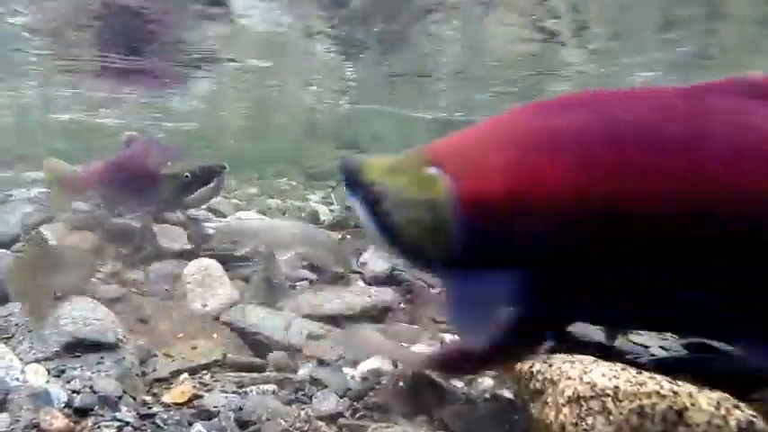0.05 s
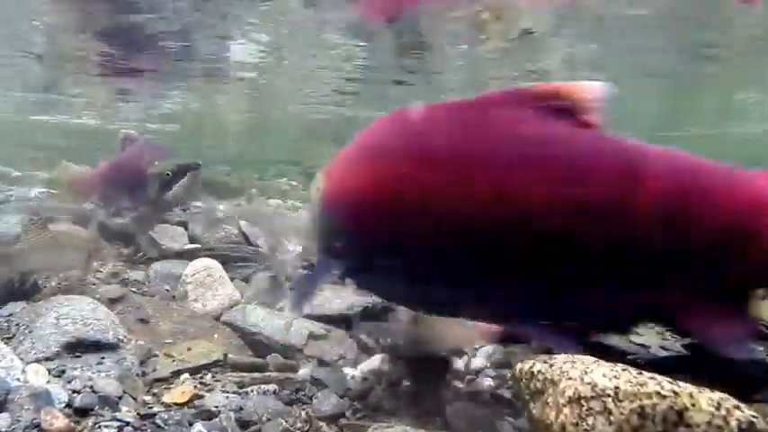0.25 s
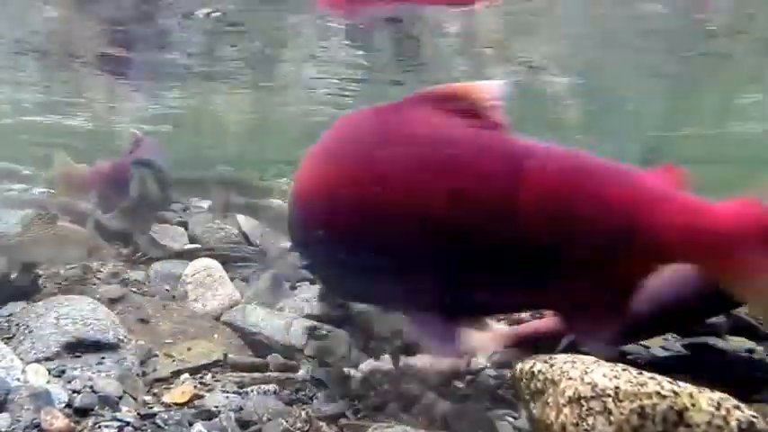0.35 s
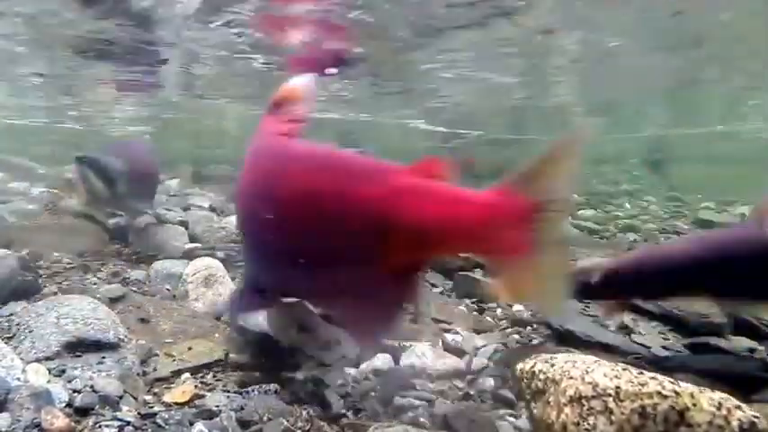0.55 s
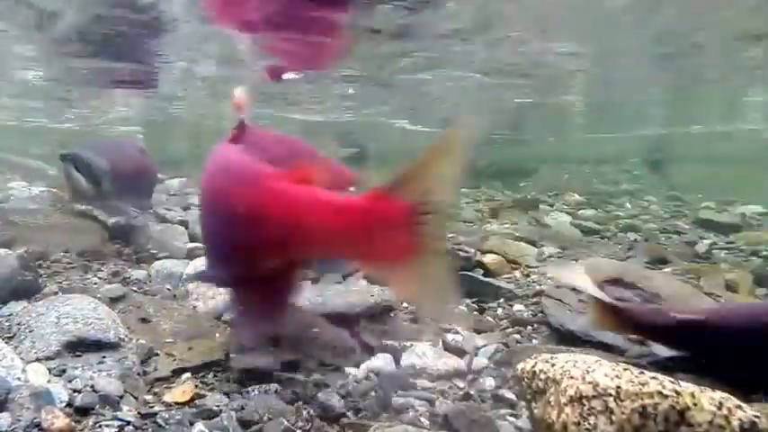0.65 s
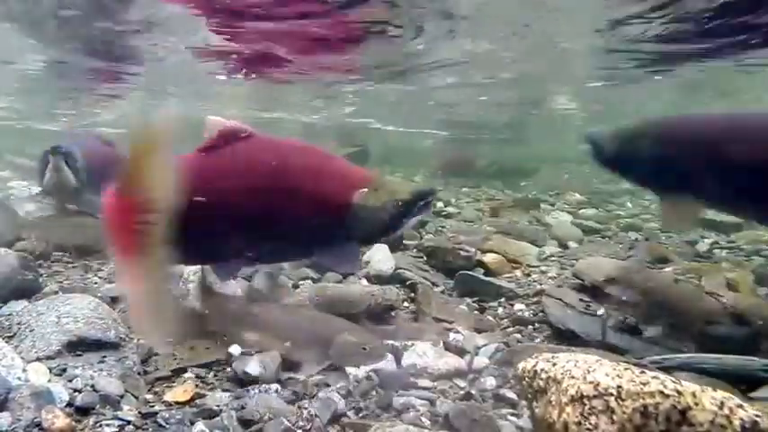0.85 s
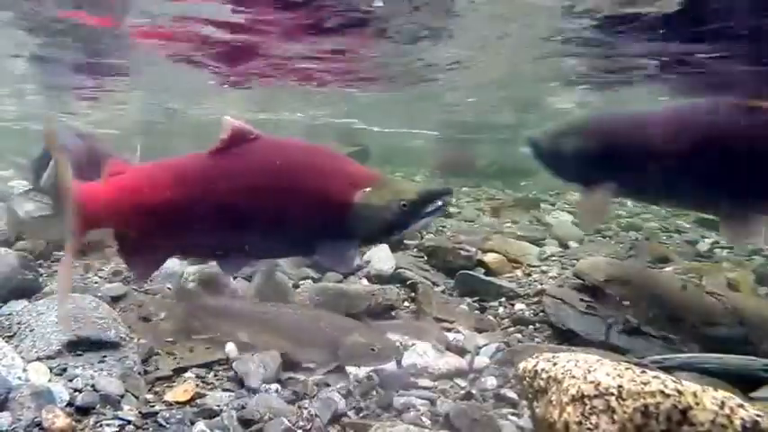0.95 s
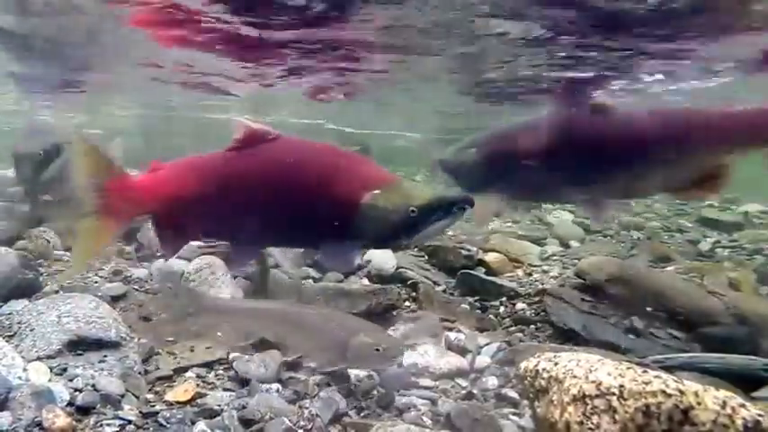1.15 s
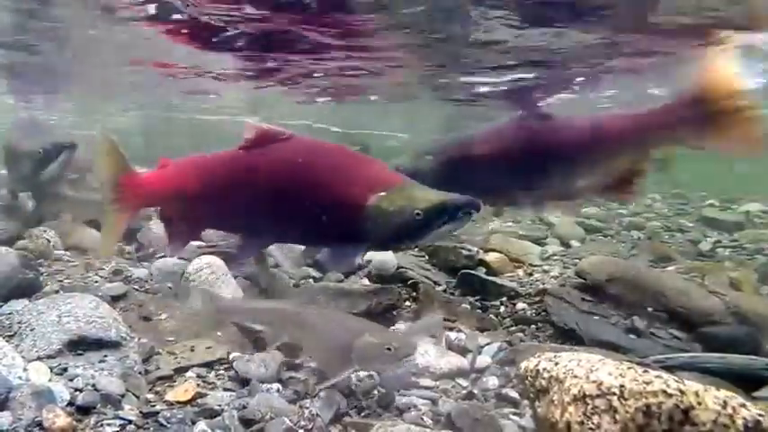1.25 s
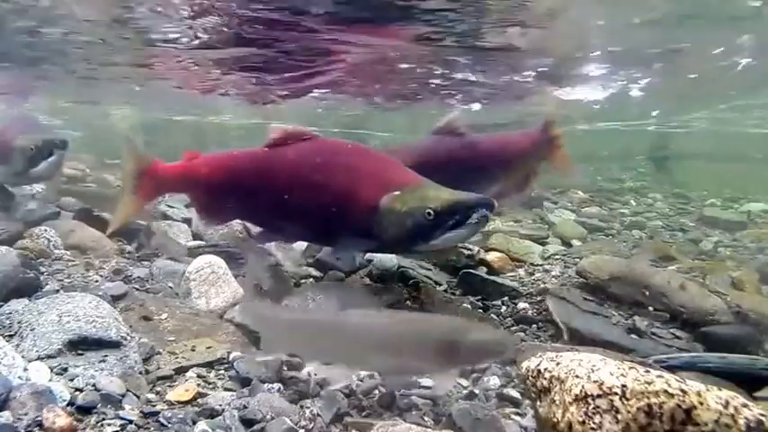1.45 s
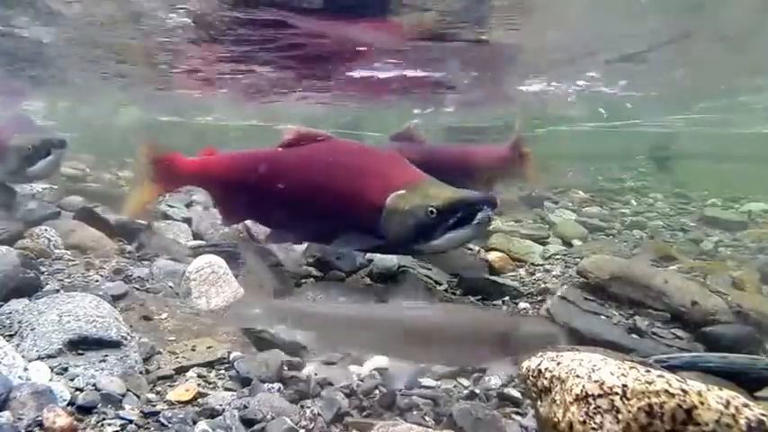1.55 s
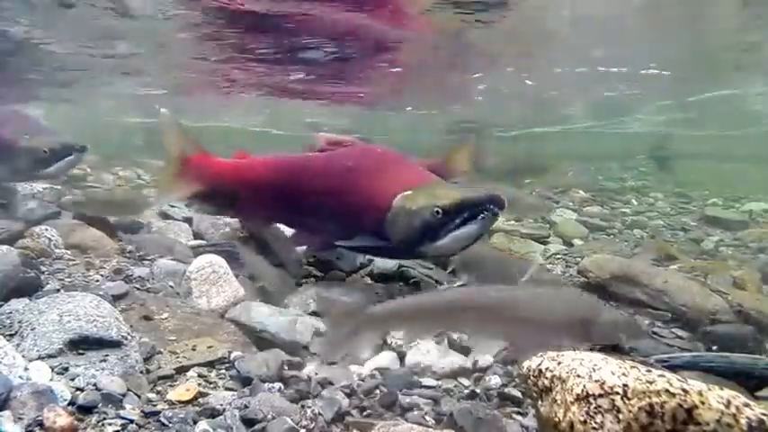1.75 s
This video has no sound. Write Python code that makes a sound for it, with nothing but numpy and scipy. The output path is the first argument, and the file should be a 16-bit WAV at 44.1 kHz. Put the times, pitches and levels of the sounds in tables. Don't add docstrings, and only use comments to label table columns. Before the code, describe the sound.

Pebbles and grit clatter briefly against an underwater camera case as a fish's tail sweeps the riverbed

```python
import sys
import numpy as np
from scipy import signal
from scipy.fft import rfft, irfft
from scipy.io import wavfile
from scipy.ndimage import uniform_filter1d

SR = 44100
rng = np.random.default_rng(int(sys.argv[2]) if len(sys.argv) > 2 else 0)


def volts_from_db(level):
    exponent = np.asarray(level, float) / 20
    return 10 ** exponent


def int16_out(signal):
    q = np.round(np.clip(np.atleast_2d(signal).T, -1, 1) * 32767)
    wavfile.write(sys.argv[1], SR, q.astype(np.int16))


N = 79380

# f/Hz, level/dB, t60/s
CASE_MODES = [(3196, -10.5, 0.016), (743, 2.5, 0.037), (1490, 4, 0.015), (1914, -3.5, 0.014),
              (2376, 4, 0.0085), (2814, 2, 0.004), (13120, -3.5, 0.0034), (3610, -17.5, 0.022),
              (4583, 5.5, 0.005), (5290, -2.5, 0.0079), (6070, -10.5, 0.011), (7370, 4, 0.0059),
              (9980, 5, 0.0037), (11100, 0.5, 0.0064)]


def add(out, start_s, sounds):
    for s, x in zip(start_s, sounds):
        i = max(int(s * SR), 0)
        out[i:i + len(x)] += x[:max(N - i, 0)]


def decay(t, t60):
    return np.exp(-np.log(1000) * t / t60)


def case_rings(size=1400):
    rise_s = 0.00007
    hz, db, t60 = np.array(CASE_MODES).T[:, :, None]
    t = np.arange(size) / SR
    sign = (-1.) ** np.arange(len(CASE_MODES))[:, None]
    swing_up = 1 - np.exp(-t / rise_s)
    return sign * volts_from_db(db) * swing_up * np.sin(2 * np.pi * hz * t) * decay(t, t60)


def knocks(rows, lean_db=None, size=2048, order=128):
    reach_oct, scatter_db = 0.99, 2.5
    dead_hz, dead_oct, dead_db, stiff_hz = 1184, 0.2, -27, 325
    evenness = 0.73
    crack_db = -14.5
    s, db, bright, ms = np.array(rows).T
    grains = rng.standard_normal((len(s), 400))
    mix_db = scatter_db * rng.standard_normal((len(s), len(CASE_MODES)))
    if lean_db:
        mix_db[:, [8, 11]] = np.outer(lean_db, [1, -1])

    f = np.maximum(np.arange(size // 2 + 1) * SR / size, 1.)
    colour_db = -6 * ((np.log2(f / 2850.0) - bright[:, None]) / reach_oct) ** 2
    colour_db = colour_db + dead_db * np.exp(-(np.log2(f / dead_hz) / dead_oct) ** 2)
    colour = volts_from_db(colour_db) / (1 + (stiff_hz / f) ** 4)

    u = np.arange(400) / SR * 1000 / np.maximum(ms, .02)[:, None]
    rattle = rfft(np.sqrt(u) * np.exp(-2 * u) * grains, size)
    rattle = rattle / np.abs(rattle) ** evenness

    ringing = rfft(volts_from_db(mix_db) @ case_rings(), size)
    crack = volts_from_db(crack_db) * f / 1000
    x = irfft((ringing + crack) * rattle * colour, size)
    gain = volts_from_db(db) / np.abs(x).max(axis=1)
    out = np.zeros(N)
    add(out, s - order / SR, np.roll(x, order, axis=1) * gain[:, None])
    return out


def pebbles():
    # t/s, peak level/dB, brightness/octaves, rattle/ms
    hits = [(.2286, -29, 1.48, 1.3), (.3192, -23, 1.13, 0.7), (.378, -37, 0.46, 1.1),
            (.4012, -30, 1.24, 0.34), (.4031, -32.5, 0.16, 0.24), (.4655, -41, 1.37, 2.2),
            (.546, -46, 0.81, 1.2), (.590, -45, 0.11, .6), (.2225, -61, 0.87, 0.31), (.340, -58, 1.6, 0.4),
            (.5981, -25.5, -0.17, 0.042), (.6005, -28.5, 1.2, 0.73), (.6912, -32, 0.75, 0.27),
            (.7385, -32.5, 1.2, 0.57), (.795, -37, 0.84, 0.51)]
    lean_db = [4.5, -1.5, 1.5, 1, -2.5, 1, -2, .1, 2, .1, -1, 1.5, 0.5, -2, -1.2]
    return knocks(hits, lean_db)


def blows():
    # t/s, length of the push/ms
    stones = [
        (.56005, .2),
        (.68772, .45),
    ]
    # hard blow/dB, dull blow/dB
    strength = [(-31.5, -24), (-37, -32), (-22.5, -23.5), (-22, -33.5), (-17.5, -27), (-21, -23),
                (-32, -28.5), (-30, -40), (-11.5, -25), (-40, -31), (-23.5, -25), (-9.5, -30)]
    mode_hz = [550, 795, 1470, 1975, 2410, 2640, 3030, 3720, 4750, 5970, 7370, 10300]
    mode_t60 = [.005, .021, .019, .014, .013, .009, .016, .02, .0057, .014, .01, .004]
    first_swing = [1, -1, 1, -1, -1, -1, -1, 1, 1, 1, -1, -1]
    hz, t60 = np.array(mode_hz)[:, None], np.array(mode_t60)[:, None]
    t = np.arange(1800) / SR
    modes = np.sin(2 * np.pi * hz * t) * decay(t, t60)
    x = (volts_from_db(np.array(strength).T) * first_swing) @ modes
    no_thud = signal.butter(2, 220, "high", fs=SR, output="sos")
    x = signal.sosfilt(no_thud, x)
    struck = []
    for ring, (_, ms) in zip(x, stones):
        push = np.hanning(round(ms * SR / 1000) + 2)[1:-1]
        struck.append(np.convolve(ring, push / push.sum()))
    out = np.zeros(N)
    add(out, [s for s, _ in stones], struck)
    return out


def grit():
    # t/s, peak level/dB, brightness/octaves, rattle/ms
    early = [(0.1436, -44, 0.45, 0.45), (0.1655, -61, 1, 0.78), (0.1792, -39, 0.91, 1),
             (0.1835, -43, 0.9, 0.8), (0.1917, -42, 1, 0.72), (0.197, -53, 0.85, 0.92), (0.2041, -48, 1, 1),
             (0.208, -50, 1, 0.94), (0.215, -49, 1, 0.93), (0.2446, -47, 0.99, 1), (0.2613, -45, 0.8, 0.7),
             (0.2692, -39.5, 0.7, 0.93), (0.2867, -40, 0.58, 0.91), (0.2907, -46, 1, 0.97),
             (0.2974, -46, 0.94, 0.48), (0.3613, -48, 1, 0.89), (0.3736, -43.5, 0.8, 0.53),
             (0.3897, -53, 0.35, 1), (0.422, -42, 1, 0.99), (0.427, -42, 0.61, 0.31),
             (0.4363, -52, 0.67, 0.58), (0.4948, -43, 0.5, 0.82), (0.5004, -47, 0.3, 0.8)]
    # t/s, peak level/dB, brightness/octaves, rattle/ms
    late = [(0.5809, -39.5, 0.77, 0.86), (0.6068, -48, 0.42, 0.97), (0.636, -48, -0.026, 0.82),
            (0.642, -40.5, 0.18, 0.65), (0.6544, -40, 0.083, 1), (0.668, -63, -0.067, 0.81),
            (0.675, -42, 1, 0.76), (0.7108, -56, 0.55, 0.85), (0.712, -39.5, 0.0062, 0.57),
            (0.7223, -46, -0.003, 0.87), (0.7246, -46, 0.21, 0.57), (0.7282, -46, 0.13, 1),
            (0.7491, -47, 0.36, 0.96), (0.8335, -49, 0.56, 0.82), (0.8451, -49, 0.6, 0.63),
            (0.9157, -47, -0.073, 0.31), (0.9294, -47.5, 0.53, 0.8), (0.9914, -46, 0.55, 0.67),
            (1.066, -48.5, 0.52, 0.73), (1.0948, -53.5, 0.56, 0.67), (1.1264, -55, 0.33, 0.66),
            (1.6696, -54, 0.79, 0.63)]
    # t/s, peak level/dB,
    # brightness/octaves, rattle/ms
    stray = [(.1875, -56, 1.4, .5), (.2295, -44, -0.086, 0.76), (.2535, -47, 1.4, .8),
             (.302, -50, 0.7, 0.76), (.347, -54, 1.7, .7), (.4315, -51, 1.5, .6), (.475, -53, 0.67, .6),
             (.5735, -54, 1.9, .9), (.5982, -31.5, 1.1, 0.6), (.5598, -33.5, 0.42, 0.077),
             (.6555, -39.5, 2, 1), (.662, -39, -0.021, 0.47), (.7715, -62, 1.2, .6),
             (.866, -56, 0.16, 0.39), (.946, -58, 1.7, .5), (.9775, -52, 0.47, .5), (1.036, -55, 1.4, .5),
             (1.045, -55, 2, .5), (1.0945, -50, 0.79, .3), (1.141, -61, 0.36, .6), (1.176, -55.5, 2, .5)]
    return knocks(early) + knocks(late) + knocks(stray)


def scrapes(count=36):
    # start t/s, length/s, grain level/dB, brightness/octaves
    slides = [
        (0.164, 0.055, -55.5, 1.6),
        (.416, 0.019, -58, 0.42),
        (0.541, 0.0098, -63, 1.2),
        (0.629, 0.053, -54.5, 0.33),
        (0.635, 0.025, -57.5, 1.3),
        (0.723, 0.0093, -60, 1.1),
        (0.734, .005, -53.5, -.3),
    ]
    rattle_ms = 0.45
    s, length, db, bright = np.array(slides).T[:, :, None]
    place, tint = rng.random((2, len(slides), count))
    rows = np.broadcast_arrays(s + length * place, db, bright + 0.49 * (tint - .5), rattle_ms)
    return knocks(np.reshape(rows, (4, -1)).T)


def sand(count=1800):
    # t/s, grain level/dB
    cloud = [(0, -69), (.13, -66), (.18, -54.5), (.3, -62.5), (.36, -63.5), (.45, -61.5), (.54, -60.5),
             (.62, -66), (.66, -55), (.74, -58.5), (.85, -61), (1.0, -64), (1.2, -67), (1.8, -73.5)]
    spread_db, bright_oct, rattle_ms = 1, 0.13, 0.68
    place, luck, tint = rng.random((3, count))
    s = place * N / SR
    db = np.interp(s, *np.array(cloud).T) - spread_db * np.log(luck + .02)
    bright = bright_oct + 2.1 * (tint - .5)
    return knocks(np.transpose(np.broadcast_arrays(s, db, bright, rattle_ms)))


def surges():
    # peak level/dB, f/Hz, half length/s
    strokes = [(-47.5, 43, 0.032), (-45, 63, 0.022), (-39, 75, 0.027), (-42, 68, 0.019), (-47, 63, 0.025),
               (-36.5, 74.4, 0.011), (-45.5, 91, 0.0044), (-40, 59.6, 0.02), (-37.5, 77.5, 0.017),
               (-37, 81.2, 0.026), (-42.5, 62, 0.033), (-24.5, 58, 0.019), (-35, 65, 0.016),
               (-49, 81, 0.064), (-45, 55, 0.017), (-39, 62, 0.0066), (-49.5, 55.4, 0.06), (-44, 84, 0.012),
               (-46, 97, 0.0069), (-49, 74, 0.0071)]
    dips = [.1, .147, .185, .208, .235, .318, .448, .51, .547, .59, .64, .682, .726, .757, .793, .818, .846,
            1.04, 1.741, 1.771]
    lag_s, overtone_db = 0.0012, -24
    t = np.arange(N) / SR
    out = np.zeros(N)
    for s, (db, hz, half) in zip(dips, strokes):
        turn = 2 * np.pi * hz * (t - s)
        swing = np.cos(turn) + volts_from_db(overtone_db) * np.cos(2 * turn)
        out -= volts_from_db(db) * swing * np.exp(-((t - s - lag_s) / half) ** 2)
    return out


def bubbles():
    # t/s, peak level/dB, f/Hz, t60/s
    pings = [
        (1.301, -48, 1430, 0.027),
        (1.392, -50, 2280, 0.028),
        (1.449, -57, 1930, 0.078),
        (1.496, -55, 1480, 0.038),
        (1.371, -48.5, 9300, .01),
        (1.421, -50, 6950, 0.011),
    ]
    glide_per_s, rise_s = 1.0, 0.0031
    t = np.arange(2600) / SR
    out = np.zeros(N)
    for s, db, hz, t60 in pings:
        tone = np.sin(2 * np.pi * hz * t * (1 + glide_per_s * t))
        add(out, [s], [volts_from_db(db) * np.minimum(t / rise_s, 1) * decay(t, t60) * tone])
    return out


def fizz():
    puffs = [.853, .925, .96, 1.016, 1.19, 1.225, 1.27, 1.304, 1.361, 1.385]
    centre_hz, level_db, length_s = 5900, -66.5, 0.0047
    t = np.arange(N) / SR
    out = np.zeros(N)
    for s in puffs:
        hz = centre_hz * (1 + .012 * rng.standard_normal())
        out += volts_from_db(level_db) * np.sin(2 * np.pi * hz * t) * np.exp(-((t - s) / length_s) ** 2)
    return out


def walk(rate):
    k = int(SR / rate)
    held = np.repeat(rng.standard_normal(N // k + 1), k)
    return 0.16 * uniform_filter1d(uniform_filter1d(held, k), k)[:N]


def flow():
    # f/Hz, level/dB per Hz
    spectrum = [(25, -10.5), (45, 1), (90, -1.5), (200, -7), (500, -12.5), (1400, -19), (6000, -29.5),
                (14500, -41.5)]
    # t/s, level added to the rumble/dB
    stir = [
        (0, -3),
        (.3, 2.5),
        (.45, 4.5),
        (.9, 1),
        (1.14, 4),
        (1.2, -2),
        (1.5, -2),
        (1.8, -.5),
    ]
    level_db, shared_db, flicker_db, eddy_db = -57, 1.87, -0.8, 9
    hiss_hz, hiss_width_hz, hiss_db = 5040, 70, 9.5
    f = np.maximum(np.arange(N // 2 + 1) * SR / N, 1.)
    hz, db = np.array(spectrum).T
    shape = volts_from_db(np.interp(np.log(f), np.log(hz), db))
    shape = shape * volts_from_db(hiss_db * np.exp(-((f - hiss_hz) / hiss_width_hz) ** 2))
    shape = shape / (1 + (f / 15000) ** 40)
    shared = walk(0.5)
    stir_db = np.interp(np.arange(N) / SR, *np.array(stir).T)
    out = np.zeros(N)
    for k in range(10):
        d = np.clip(np.log2(f / 26.3) - k, -1, 1)
        band = irfft(rfft(rng.standard_normal(N)) * shape * np.cos(np.pi * d / 2), N)
        roll_db = (eddy_db if k < 2 else flicker_db) * walk(11.8)
        out += band * volts_from_db(shared_db * shared + roll_db + (k < 3) * stir_db)
    return out * volts_from_db(level_db) / out.std()


def scene():
    stones = pebbles() + blows() + grit() + scrapes() + sand()
    water = surges() + bubbles() + fizz() + flow()
    return (stones + water)[None]


def shed_top(x):
    mask_hz, mask_db, mask_s = 12800, -37, .05
    top = signal.sosfiltfilt(signal.cheby2(8, 40, mask_hz, "high", fs=SR, output="sos"), x)
    top_power = uniform_filter1d(top ** 2, int(mask_s / 5 * SR))
    power = uniform_filter1d(x ** 2, int(mask_s * SR))
    masked = top_power < volts_from_db(2 * mask_db) * power
    return x - top * uniform_filter1d(1. * masked, size=128)


def band_limit(x):
    return signal.sosfilt(signal.butter(12, 16480, fs=SR, output="sos"), x)


def record(dry):
    mic_path = signal.cheby2(8, 30, 16200, fs=SR, output="sos")
    mix = signal.sosfilt(mic_path, shed_top(dry))
    return band_limit(mix)


dry = scene()
out = record(dry)
int16_out(out)
```